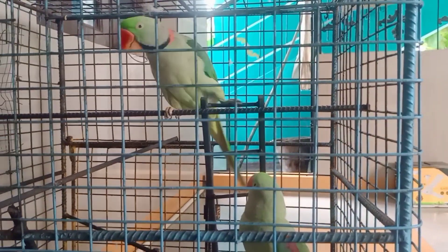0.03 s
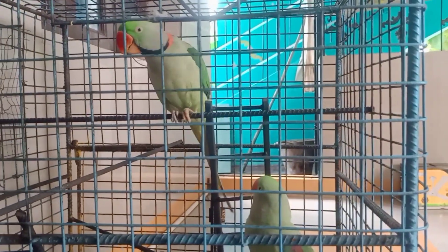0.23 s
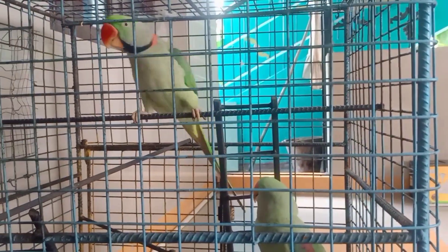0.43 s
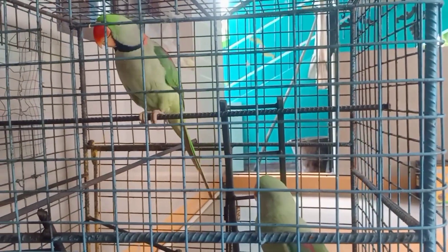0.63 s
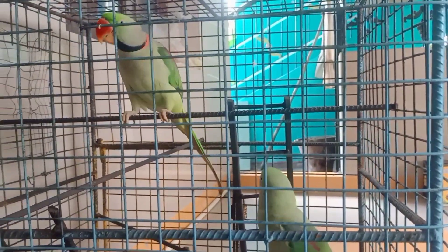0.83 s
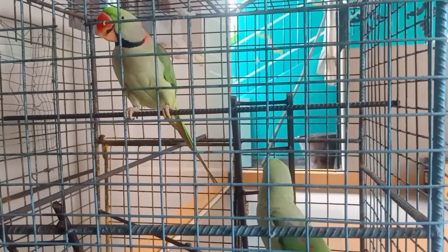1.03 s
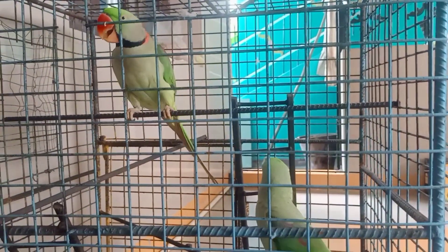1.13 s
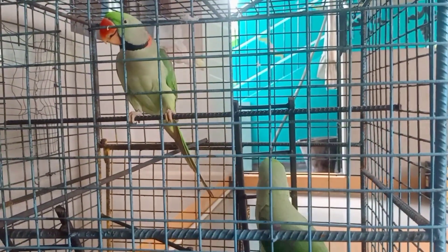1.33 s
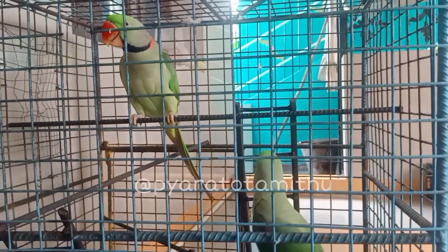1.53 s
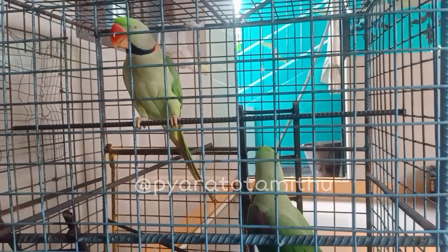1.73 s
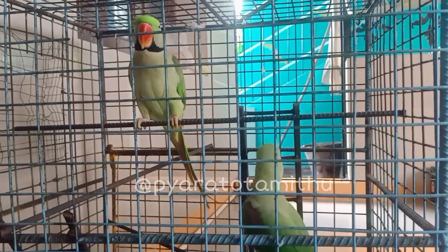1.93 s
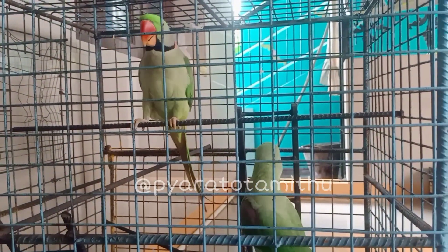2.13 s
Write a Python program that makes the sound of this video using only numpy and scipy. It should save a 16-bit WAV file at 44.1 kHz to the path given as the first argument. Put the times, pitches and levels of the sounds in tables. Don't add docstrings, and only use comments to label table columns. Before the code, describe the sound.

One parakeet call in a hard, echoing room. From 0 to 1.25 s, a steady fan hiss and low wavering drone, with faint dull bumps around 0.2, 0.4, 0.65 and 1.0-1.15 s. The hiss ducks abruptly; at 1.27 s a noisy rasp breaks into a piercing whistle falling near 3 kHz, then a lower note from 1.41 s, hoarse and fading by 1.63 s. Echo decays into quieter hiss.

```python
import sys
import numpy as np
from scipy import signal
from scipy.fft import rfft, irfft, next_fast_len
from scipy.io import wavfile
from scipy.ndimage import uniform_filter1d, minimum_filter1d, map_coordinates

SR = 44100
rng = np.random.default_rng(int(sys.argv[2]) if len(sys.argv) > 2 else 0)


def gain_from_db(level_db):
    decades = np.asarray(level_db, float) / 20
    return 10 ** decades


def store_pcm(level_fs):
    pcm = np.round(np.clip(level_fs, -1, 1) * 32767).astype(np.int16)
    wavfile.write(sys.argv[1], SR, np.atleast_2d(pcm).T)


N = 96887
TIME = np.arange(N) / SR
LEFT_RIGHT = np.array([[1], [-1]])

# frequency in Hz, level in dB.
HISS_COLOUR = [(25, -36.5), (62, -13), (200, -11.5), (550, -7), (1000, -5), (2500, -10.5), (4000, -22.5),
               (7000, -39), (8300, -52.5), (9300, -95)]
# frequency in Hz, level in dB.
DUCKED_HISS_COLOUR = [(25, -20.5), (110, -4), (220, -12), (500, -3.5), (780, -8.5), (1200, -1), (2500, -4),
                      (4000, -16), (6800, -30.5), (7800, -47.5), (8800, -94)]
# centre in Hz, width in Hz, level in dB.
HOUSING = [(535.9, 105, 9), (589, 70, -4), (119, 17.7, -23)]
# time in seconds, level in dB.
DRONE_SWELLS = [(0.0, -50), (0.024, -46.5), (0.33, -40.5), (0.392, -46), (0.41, -48.5), (0.566, -41),
                (0.598, -45), (0.672, -42), (0.726, -49), (0.754, -42.5), (1.012, -44), (1.026, -42),
                (1.228, -42), (1.25, -51)]
# frequency in Hz, likeness from 0 to 1.
ALIKE = [(60, .72), (250, .76), (600, .8), (1500, .2), (4000, .17), (8000, .1)]
# frequency in Hz, left over right in dB.
NOISE_BALANCE = [(60, 0.5), (110, 1.5), (200, -2.5), (380, -4), (700, -2.5), (1290, -6), (2380, 0.5),
                 (4400, 3.5), (8120, 8.5), (15000, -20)]
# time in seconds, length in seconds, pitch in Hz, level in dB.
BUMPS = [(0.192, 0.048, 125, -44), (0.367, 0.036, 110, -48.5), (0.639, 0.049, 115, -47),
         (0.999, 0.12, 62, -53), (1.144, 0.0108, 129.7, -42.5)]
# frequency in Hz, seconds to fall by 60 dB.
ROOM_DECAY = [(500, 0.09), (2200, 0.56), (3000, 0.697), (4400, 0.462), (6000, 0.738), (12000, 0.27)]
# time in seconds, pitch in Hz, tone in dB, breath in dB.
RASP = [(1.273, 2300, -39.5, -45.5), (1.276, 2400, -20, -25.5), (1.285, 2700, -14.5, -9),
        (1.292, 3150, -12.5, -11), (1.296, 3250, -31.5, -10.5), (1.308, 3200, -51, -16.5),
        (1.35, 3210, -56.5, -30.5), (1.366, 3200, -72, -54)]
# frequency in Hz, level in dB.
BREATH_COLOUR = [(350, -36.5), (680, -11.5), (1400, -10.5), (2300, 6), (3300, -4.5), (4800, -8.5),
                 (7500, -21), (9300, -59.5), (10000, -100)]
# time in seconds, pitch in Hz, level in dB, left over right in dB.
HIGH_NOTE = [(1.301, 3130, -24, 0), (1.309, 3048, -9, -1), (1.322, 3030, -8, -3), (1.34, 3018, -21, -3),
             (1.352, 3010, -14, -1), (1.369, 2975, -16, -3), (1.383, 2858, -7.5, 11),
             (1.403, 2812, -6.5, 10), (1.411, 2805, -18, 4)]
# time in seconds, pitch in Hz, level in dB, left over right in dB.
LOW_NOTE = [(1.408, 2347, -22, -3.5), (1.418, 2215, -15.5, -4.5), (1.442, 2204, -14, -20),
            (1.462, 2217, -17.5, -16), (1.48, 2228, -12.5, -6), (1.495, 2214, -24.5, -4),
            (1.545, 2242, -23, 9), (1.6, 2214, -25.5, 10.5), (1.635, 2181, -39.5, 4.5)]
# multiple of the pitch, level against the fundamental in dB.
HIGH_OVERTONES = [(2, -21.5), (3, -37.5), (4, -42.5), (5, -47)]
# multiple of the pitch, level against the fundamental in dB.
LOW_OVERTONES = [(1.84, -31), (2, -9), (3, -22.5), (4, -38.5), (5, -49), (6, -57), (7, -61.5)]
# frequency in Hz, lead in radians.
LEFT_LEAD = [(1, 0), (600, .4), (900, 1.3), (1460, 3.9), (2410, 6.7), (3100, 7.9), (4050, 12.6),
             (16000, 30)]
# time in seconds, gain in dB.
SUPPRESSOR = [(1.352, -1), (1.37, -9), (1.425, -1), (1.44, -10), (1.515, -5.5), (1.545, 2)]

HISS_DB, DUCKED_HISS_DB, DRONE_DB, SWELL_DB_PER_S = -34.5, -44.5, -46.5, 0.13
DUCK_S, DUCK_FALL_S = 1.257, 0.0032
ECHO_DB, WALL_DELAY_S, ECHO_BUILD_S = -9.5, 0.015, 0.0065
PULSES_HZ, PULSE_DEPTH, PITCH_SCATTER_HZ = 330, 0.433, 151.03
BREATH_DB, RASP_OCTAVE_DB, UNDERTONE_DB = -1.5, -22.5, -15
SPIT_DB, SPIT_END_S, SPIT_HZ = -46, 1.314, 8000
SECOND_HZ, SECOND_RISE_HZ_PER_S = 2018.8, 35000
SECOND_S, SECOND_LEN_S, SECOND_DB = 1.298, 0.003, -20.5
FLUTTER_DB, QUIVER_HZ = 1.2, 6
FUZZ, FUZZ_GROWS_S, FUZZ_LATE = 0.07, 1.49, 0.55
HIGH_STRAIN_DB = -11.5
THIN_FROM, THIN, SMEAR = 5, 2.2, 1.5
BEAK_OPENS_S, OPENING_S = 1.306, 0.008
RIGHT_TOP_HZ = 6100
SUPPRESSOR_TOP_HZ = 1944
INPUT_TOP, KNEE, THUMP_DB = 0.969, 12, -6
CEILING, HOLD_S = 0.93, 0.006
SELF_NOISE_DB, TOP_HZ = -96, 15600


def unit(x):
    return x / np.sqrt(np.mean(x ** 2) + 1e-20)


def along(points, hz):
    f, v = np.transpose(points)
    return np.interp(np.log(hz + 1), np.log(f + 1), v)


def curves(rows):
    s, *columns = np.transpose(rows)
    active = np.clip(np.minimum(TIME - s[0], s[-1] - TIME) / 0.003, 0, 1)
    return [np.interp(TIME, s, column) for column in columns] + [active]


def wobble(rate):
    return map_coordinates(rng.standard_normal(size=2048), [np.arange(N) * rate / SR], mode="wrap")


def running_phase(hz):
    return 2 * np.pi * np.cumsum(hz) / SR


def filtered(x, response):
    m = next_fast_len(N + SR // 2)
    return irfft(rfft(x, m) * response(np.fft.rfftfreq(m, 1 / SR)), m)[..., :N]


def rush(gain, patchy_db):
    z = signal.stft(rng.standard_normal((2, N)), nperseg=512)[2]
    patches = uniform_filter1d(rng.standard_normal(z.shape[1:]), 6, 0)
    patches = unit(uniform_filter1d(patches, 12, 1))
    pair = signal.istft(z * gain_from_db(patchy_db * patches), nperseg=512)[1][:, :N]

    def spread(hz):
        turn = np.arccos(np.clip(along(ALIKE, hz), -1, 1)) / 2
        return gain(hz) * [np.cos(turn), np.sin(turn)]

    mid, side = filtered(pair, spread)
    lean = lambda hz: gain_from_db(along(NOISE_BALANCE, hz) / 2 * LEFT_RIGHT)
    return unit(filtered(np.array([mid + side, mid - side]), lean))


def housing(hz):
    return sum(gain_from_db(db) * hz * width / np.hypot(centre * centre - hz * hz, hz * width)
               for centre, width, db in HOUSING) ** 2


def hiss():
    before = np.clip((DUCK_S - TIME) / DUCK_FALL_S + 1, 0, 1)
    swell_db = curves(DRONE_SWELLS)[0]
    air_db = HISS_DB + SWELL_DB_PER_S * TIME + 0.62 * wobble(4.09)
    air = gain_from_db(air_db) * rush(lambda hz: gain_from_db(along(HISS_COLOUR, hz)), patchy_db=1.6)
    drone_db = DRONE_DB + 1.71 * (swell_db - swell_db.mean())
    drone = gain_from_db(drone_db) * rush(housing, patchy_db=2.0)
    ducked_db = DUCKED_HISS_DB + 0.55 * wobble(2.1)
    ducked = gain_from_db(ducked_db) * rush(lambda hz: gain_from_db(along(DUCKED_HISS_COLOUR, hz)), patchy_db=0.5)
    return before * (air + drone) + (1 - before) * ducked


def bumps():
    total = np.zeros(N)
    for s, length, hz, db in BUMPS:
        swell = gain_from_db(db + 4.1 * wobble(27)) * np.exp(-((TIME - s) / length) ** 2)
        total += swell * np.sin(running_phase(hz * (1 + 0.16 * wobble(45))))
    return total * np.sqrt(2)


def room(x):
    hz, t, z = signal.stft(rng.standard_normal((2, SR)), SR, nperseg=256)
    shape = (1 - np.exp(-t / ECHO_BUILD_S)) * gain_from_db(-60 * t / along(ROOM_DECAY, hz)[:, None])
    tail = signal.istft(z * shape, SR, nperseg=256)[1]
    tail = tail / np.linalg.norm(tail[0])
    delayed = np.pad(x, (int(WALL_DELAY_S * SR), 0))
    return signal.fftconvolve(delayed[None], tail, axes=1)[:, :N]


def second_voice():
    joins = np.exp(-((TIME - SECOND_S) / SECOND_LEN_S) ** 2)
    rising_hz = SECOND_HZ + SECOND_RISE_HZ_PER_S * (TIME - SECOND_S)
    phase = running_phase(rising_hz + 60 * wobble(300))
    return gain_from_db(SECOND_DB) * joins * (np.sin(phase) + gain_from_db(-3.5) * np.sin(2 * phase))


def rasp_breath():
    breath = unit(filtered(rng.standard_normal((2, N)), lambda hz: gain_from_db(along(BREATH_COLOUR, hz))))
    spit = unit(filtered(rng.standard_normal((2, N)), lambda hz: hz > SPIT_HZ))
    return breath + gain_from_db(SPIT_DB) * spit * np.clip((SPIT_END_S - TIME) / 0.004, 0, 1)


def rasp():
    pitch, level_db, breath_db, on = curves(RASP)
    pulses = 1 + PULSE_DEPTH * np.sin(running_phase(PULSES_HZ * gain_from_db(2.0 * wobble(120))))
    phase = running_phase(pitch + PITCH_SCATTER_HZ * wobble(700))
    octave = gain_from_db(RASP_OCTAVE_DB) * pulses * np.sin(2 * phase)
    undertone = gain_from_db(UNDERTONE_DB) * np.sin(phase / 4)
    tone = np.sin(phase) + octave + undertone
    voice = np.sqrt(2) * (gain_from_db(level_db) * pulses * tone + second_voice())
    return on * (voice + gain_from_db(breath_db + BREATH_DB) * pulses * rasp_breath())


def whistle(rows, overtones, strain_db):
    pitch, level_db, pan_db, on = curves(rows)
    phase = running_phase(pitch + QUIVER_HZ * wobble(90))
    fuzz = FUZZ + FUZZ_LATE * np.clip((TIME - FUZZ_GROWS_S) / 0.04, 0, 1)
    hoarse = lambda: 1 + fuzz * np.array([wobble(330), wobble(330)])
    upper = 0
    for multiple, db in overtones:
        over = max(multiple - THIN_FROM, 0)
        thin = gain_from_db(THIN * (level_db - level_db.max()) * (over > 0))
        smear = 1 + SMEAR * over * wobble(600)
        strength = gain_from_db(db + 2.0 * wobble(40.56)) * hoarse() * thin * smear
        upper = upper + strength * np.sin(multiple * phase)
    upper = upper * np.clip((TIME - BEAK_OPENS_S) / OPENING_S, 0, 1)
    fundamental = gain_from_db(pan_db * LEFT_RIGHT / 2) * hoarse() * np.sin(phase)
    wave = fundamental + gain_from_db(np.minimum(strain_db - level_db, 0)) * upper
    return np.sqrt(2) * on * gain_from_db(level_db + FLUTTER_DB * wobble(70.475)) * wave


def ports(pair):
    def response(hz):
        lead = np.exp(0.5j * along(LEFT_LEAD, hz) * LEFT_RIGHT)
        return lead * [hz ** 0, 0.045 + 1 / (1 + (hz / RIGHT_TOP_HZ) ** 12)]

    return filtered(pair, response)


def scene():
    call = rasp() + whistle(HIGH_NOTE, HIGH_OVERTONES, HIGH_STRAIN_DB) + whistle(LOW_NOTE, LOW_OVERTONES, 0)
    echo = gain_from_db(ECHO_DB) * room(unit(call.sum(0)) * np.std(call))
    return ports(call + echo + hiss() + bumps())


def limited(x):
    span = int(HOLD_S * SR)
    need = minimum_filter1d(np.minimum(1, CEILING / (np.abs(x) + 1e-9)), 2 * span)
    return x * uniform_filter1d(uniform_filter1d(need, span), span)


def top_cut(x):
    return signal.sosfilt(signal.butter(12, 15900, fs=SR, output="sos"), x)


def record(dry):
    low = filtered(dry, lambda hz: 1 / (1 + (hz / SUPPRESSOR_TOP_HZ) ** 16))
    x = dry + low * (gain_from_db(curves(SUPPRESSOR)[0]) - 1)
    tops = [[INPUT_TOP], [10 * INPUT_TOP]]
    soft = x / (1 + np.abs(x / tops) ** KNEE) ** (1 / KNEE)
    overload = np.abs(x - soft) * [[1], [0]] * (TIME > SUPPRESSOR[0][0])
    thump = filtered(overload, lambda hz: (hz > 25) / (1 + (hz / 250) ** 4))
    self_noise = gain_from_db(SELF_NOISE_DB) * rng.standard_normal(dry.shape)
    loud = limited(soft + gain_from_db(THUMP_DB) * thump + self_noise)
    mix = filtered(loud, lambda hz: 1 / (1 + (hz / TOP_HZ) ** 200))
    return top_cut(mix)


dry = scene()
out = record(dry)
store_pcm(out)
```